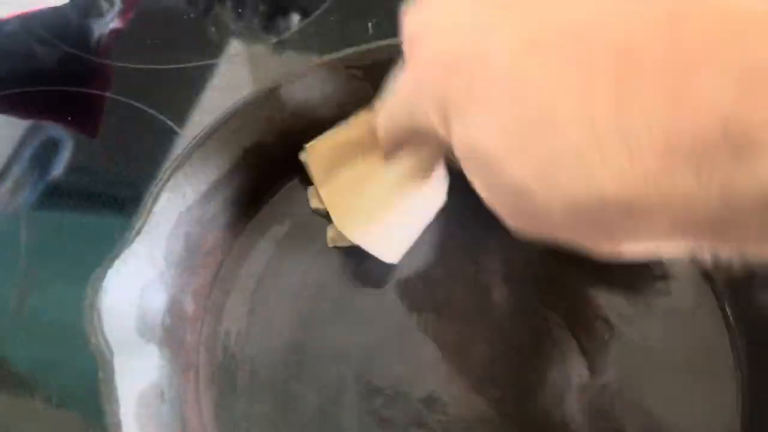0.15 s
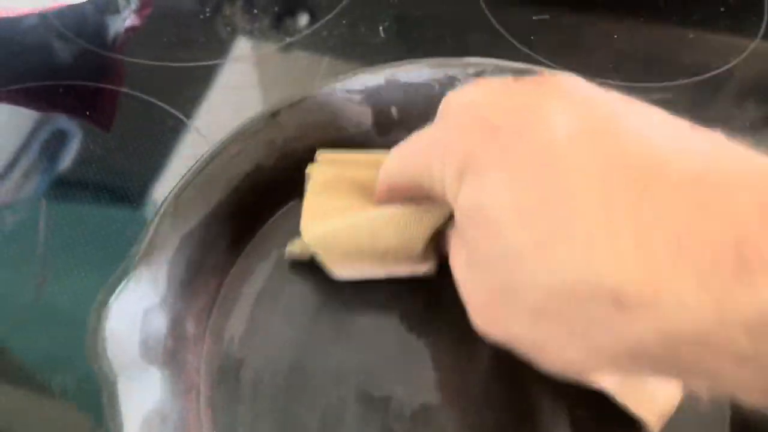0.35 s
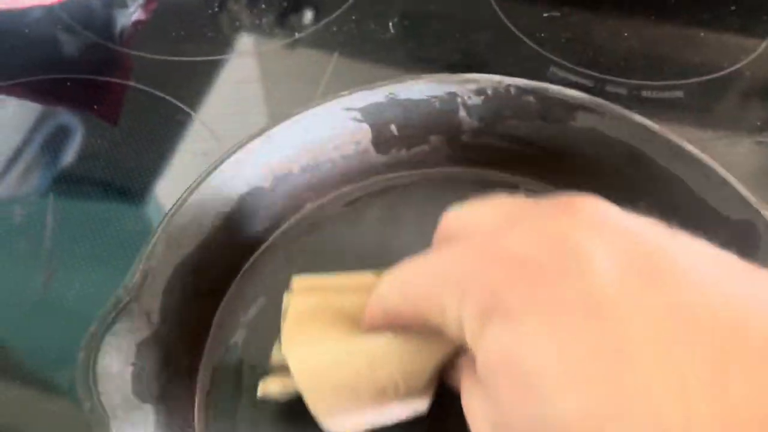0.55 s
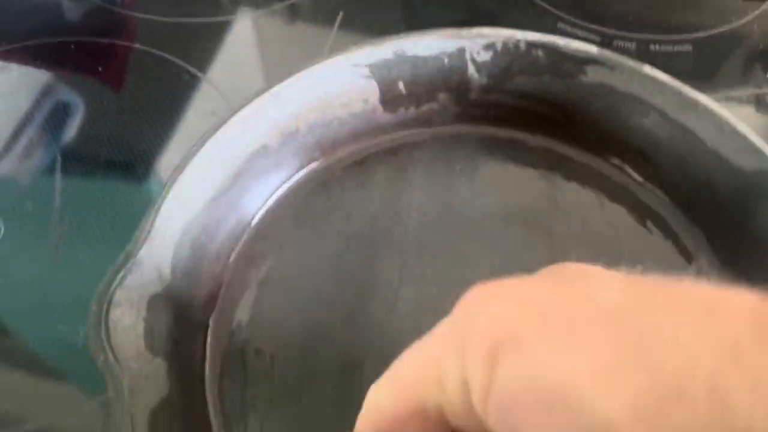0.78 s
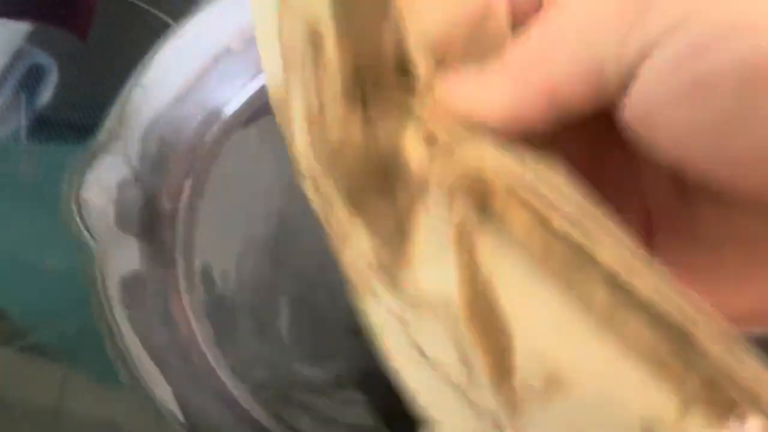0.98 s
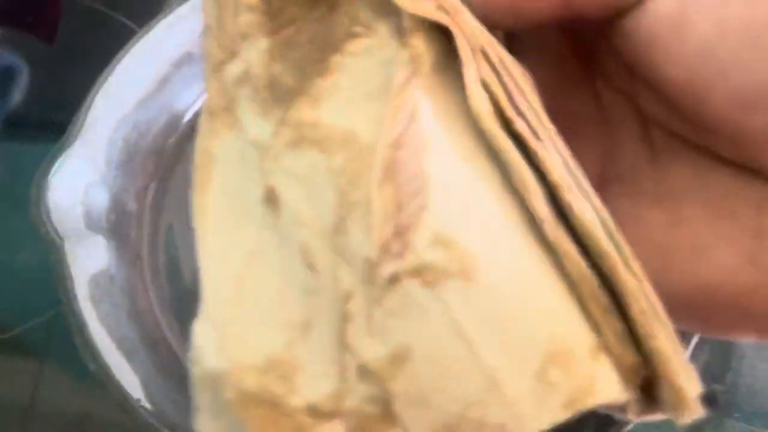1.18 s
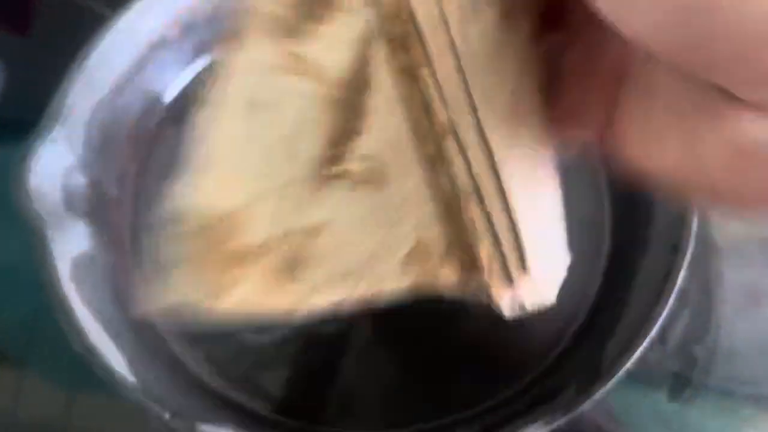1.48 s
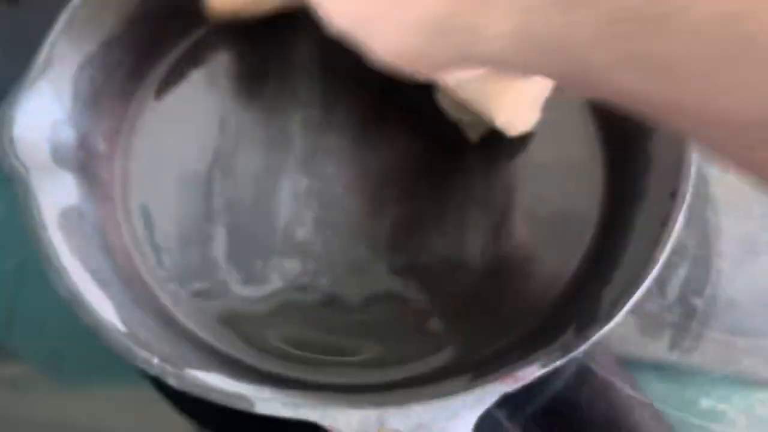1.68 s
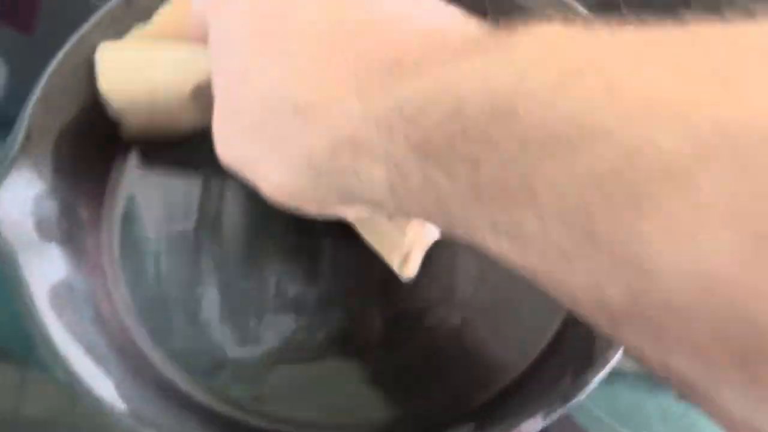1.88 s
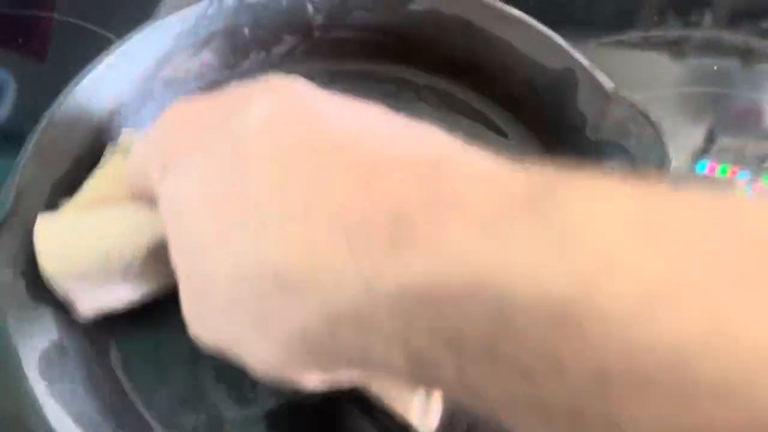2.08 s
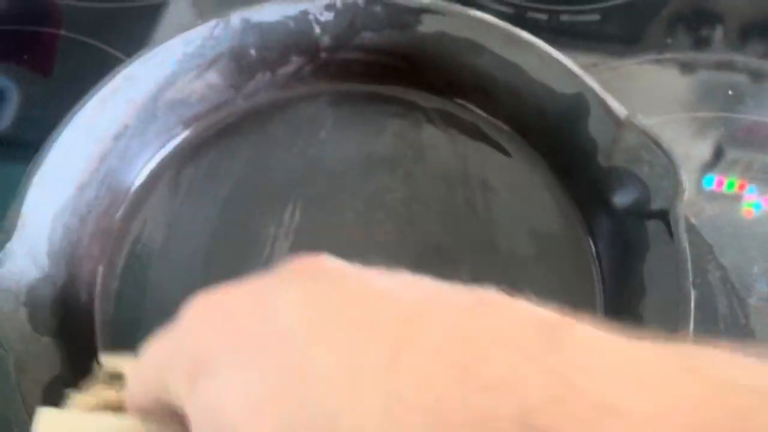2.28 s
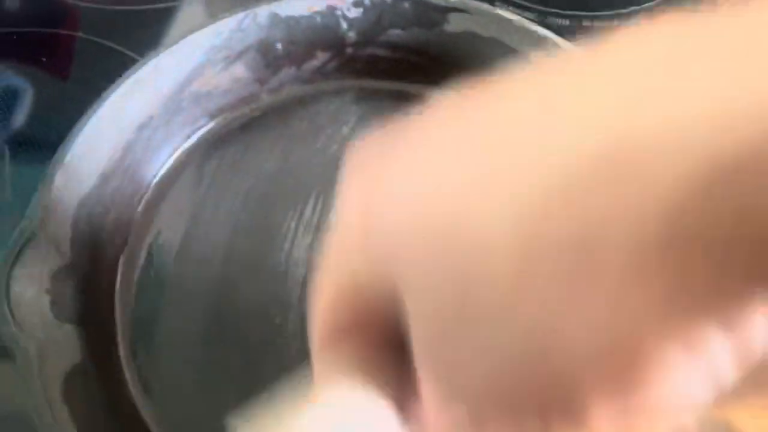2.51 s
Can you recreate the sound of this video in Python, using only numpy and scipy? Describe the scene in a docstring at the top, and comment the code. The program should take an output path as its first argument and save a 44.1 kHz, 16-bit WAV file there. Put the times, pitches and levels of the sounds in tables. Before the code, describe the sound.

A paper towel wipes a wet cast-iron pan, close-miked: bright hiss, fizz and rough scraping swell in strokes from 0 to 1 s, with a heavy dull bump near 0.17 s and a small snap at 0.4. From 1 to 1.5 s it nearly stops, with faint crinkles. Wiping resumes around 1.65; a short sharp iron knock at 1.76, a softer bump at 1.91, a last stroke fading after 2.4. Low hum and air throughout a small kitchen.

```python
"""A folded paper towel wipes around a wet cast-iron pan for a second; its fibres hiss, fizz and scrape.
Where it is pressed it drags and shudders, made of noise in uneven grips and slips; the pan bumps dully on the hob.
Then the towel is lifted and turned in the hand, with small crinkling ticks, and set down.
It wipes again, and early on the iron knocks once, sharply: noise cracks and bright, quickly damped tones.
Throughout, a low hum of wavering sines and a soft rush of air fill the small kitchen."""
import sys
import numpy as np
from scipy import signal
from scipy.fft import rfft, irfft, next_fast_len
from scipy.io import wavfile
from scipy.ndimage import uniform_filter1d, map_coordinates

SR = 44100
rng = np.random.default_rng(int(sys.argv[2]) if len(sys.argv) > 2 else 0)


def dump(signal):
    """Clip the signal to [-1, 1] and save it as 16-bit WAV at the path in sys.argv[1]."""
    limited = np.clip(np.atleast_2d(signal).T, -1, 1)
    pcm = np.round(limited * 32767).astype(np.int16)
    wavfile.write(sys.argv[1], SR, pcm)


N = 116865  # length of the scene, in samples
FLAT = [(100, 0)]  # a spectrum with no colour: (frequency [Hz], level [dB])


def amp(db):
    """Decibels to gain."""
    return 10 ** (np.asarray(db) / 20)


def unit(x):
    """Scale to rms 1."""
    return x / np.sqrt(np.mean(x ** 2) + 1e-20)


def along(points, hz):
    """Read a table of (frequency [Hz], value) on a log frequency axis."""
    f, v = np.transpose(points)
    return np.interp(np.log(hz + 1), np.log(f + 1), v)


def curve(rows, axis=1):
    """One column of a time table, drawn as a line through every sample."""
    rows = np.asarray(rows)
    return np.interp(np.arange(N) / SR, rows[:, 0], rows[:, axis])


def wobble(rate):
    """A smooth random curve with this many random points a second."""
    points = rng.standard_normal(int(N * rate / SR) + 4)
    return map_coordinates(points, [np.arange(N) * rate / SR])


def swell(middle_s, length_s, db):
    """A bell-shaped rise and fall; length_s is its standard deviation."""
    t = np.arange(N) / SR
    return amp(db) * np.exp(-.5 * ((t - middle_s) / length_s) ** 2)


def noise_pair():
    """Two unrelated white noises."""
    return rng.standard_normal((2, N))


def filtered(x, response):
    """Shape x by a gain that depends on frequency."""
    m = next_fast_len(N + SR // 2)
    hz = np.fft.rfftfreq(m, 1 / SR)
    return irfft(rfft(x, m) * response(hz), m)[..., :N]


def add(track, s, sound):
    """Mix a sound into a track at time s."""
    part = track[..., round(s * SR):][..., :sound.shape[-1]]
    part += sound[..., :part.shape[-1]]


def lean(x, left_db):
    """Make the left side louder than the right by left_db; negative leans right."""
    return x * amp([[left_db / 2], [-left_db / 2]])


# how alike left and right are: (frequency [Hz], coherence [0 to 1])
LIKENESS = [(100, .98), (350, .96), (900, .8), (1450, .5), (2000, .75), (2900, .45), (3900, .63),
            (6000, .57), (7100, .42), (8550, .98), (9400, .8), (10300, .97), (11300, .88), (12100, .97),
            (12900, .4)]


def spread(pair, spectrum):
    """Colour two unrelated signals and blend them to a stereo pair of rms 1."""
    def middle_and_side(hz):
        angle = np.arccos(np.clip(along(LIKENESS, hz), -1, 1)) / 2
        return amp(along(spectrum, hz)) * [np.cos(angle), np.sin(angle)]

    mid, side = filtered(pair, middle_and_side)
    return unit(np.array([mid + side, mid - side]))


# steady low hum tones, around which the level wavers: (frequency [Hz], level [dB])
HUM_TONES = [(59.5, -60.5), (119, -61), (178, -64), (280, -64.5)]
# colour of the rushing air: (frequency [Hz], relative level [dB])
AIR_COLOUR = [(20, -42), (40, -19), (58, 1), (80, -1), (115, 1.5), (145, -10), (180, -1.5), (215, -10),
              (275, -2.5), (340, -17.5), (600, -19), (1200, -38.5), (4000, -43.5), (13000, -56)]
AIR_DB = -51.5


def background():
    """An appliance hums, its tones wavering slowly, over a low rush of air."""
    t = np.arange(N) / SR
    hum = np.zeros(N)
    for hz, db in HUM_TONES:
        level = amp(db + 3.4 * wobble(5.55)) * np.sqrt(2)  # sqrt(2): the level is an rms value
        hum += level * np.sin(2 * np.pi * hz * t + 0.38 * wobble(5.1))
    return hum + amp(AIR_DB) * spread(noise_pair(), AIR_COLOUR)


# how long the room takes to die away by 60 dB: (frequency [Hz], decay time [s])
ROOM_DECAY = [(150, 0.36), (1500, 0.19), (10000, .2)]


def kitchen(x):
    """The room's short answer: a fading noise tail for each side."""
    hz, t, z = signal.stft(rng.standard_normal((2, SR // 2)), SR, nperseg=256)
    fade = amp(-60 * t / along(ROOM_DECAY, hz)[:, None])
    tail = signal.istft(z * fade, SR, nperseg=256)[1]
    tail = spread(tail, FLAT)[:, :SR // 2]
    return signal.fftconvolve(x, tail / np.linalg.norm(tail[0]), axes=1)[:, :N]


# the pan is pushed over the hob: (middle [s], length [s], level [dB])
PAN_SHIFTS = [(.005, 0.022, -46), (0.194, 0.018, -33), (0.312, 0.075, -40), (1.83, 0.072, -44),
              (2.518, 0.075, -49)]
# colour of its low rumble: (frequency [Hz], relative level [dB])
RUMBLE_COLOUR = [(30, -22), (55, 0.5), (75, 5), (110, -3.5), (145, 0.5), (200, -7), (260, -1.5),
                 (400, -35.5), (800, -53)]


def shifts():
    """The heavy pan rumbles as it is pushed over the hob: low noise in swells."""
    swells = sum(swell(*row) for row in PAN_SHIFTS)
    return swells * spread(noise_pair(), RUMBLE_COLOUR)


# the pocket under the cupped towel resonates:
# (middle [s], length [s], level [dB], frequency [Hz], half width [Hz])
TOWEL_POCKETS = [(.48, 0.072, -51.5, 4900, 250), (.66, 0.054, -50.5, 2004, 110),
                 (0.942, 0.028, -52.5, 3730, 600), (2.31, .05, -51, 2450, 250),
                 (2.378, .04, -47, 5700, 650)]


def hollows():
    """Rubbing noise rings in the pocket between towel and pan, a narrow band of it each time."""
    out = np.zeros((2, N))
    for s, length_s, db, centre_hz, width_hz in TOWEL_POCKETS:
        resonance = lambda hz: 1 / (1 + ((hz - centre_hz) / width_hz) ** 2)
        band = unit(filtered(spread(noise_pair(), FLAT), resonance))
        out += swell(s, length_s, db) * band
    return lean(out, left_db=-2.5)


# the wet paper catches on the iron: (time [s], level [dB], centre frequency [Hz])
PAPER_SNAPS = [(0.4000, -23, 5060), (1.160, -60.5, 9000), (1.325, -54.5, 1190), (1.536, -46, 7000),
               (1.602, -37, 990), (1.7581, -34, 800), (1.908, -36.5, 2500)]
SNAP_T60_S, SNAP_OCTAVES = 0.014, 1.13  # time to fade by 60 dB; spread around the centre


def snaps():
    """Folds of wet paper catch and let go: short bursts of noise around one pitch region."""
    out, t = np.zeros((2, N)), np.arange(SR // 8) / SR
    for s, db, centre_hz in PAPER_SNAPS:
        bell = lambda hz: np.exp(-.5 * (np.log2((hz + 1) / centre_hz) / SNAP_OCTAVES) ** 2)
        burst = unit(filtered(spread(noise_pair(), FLAT), bell))
        add(out, s, burst[:, :len(t)] * amp(db - 60 * t / SNAP_T60_S))
    return out


STRIKE_SCATTER_DB = 1.5  # random difference in each mode from strike to strike


def ring(modes, t):
    """Damped modes (the tones a struck body rings with), a little different at every strike."""
    out = np.zeros(len(t))
    for k, (hz, db, t60) in enumerate(modes):
        level_db = db + STRIKE_SCATTER_DB * rng.standard_normal()
        sign = (-1) ** k  # neighbouring modes start in opposite directions
        out += sign * amp(level_db - 60 * t / t60) * np.sin(2 * np.pi * hz * t)
    return out


# the pan bumps on the hob: (time [s], level [dB], contact time [s])
PAN_BUMPS = [(0.1638, -26, .0003), (0.1709, -8, 0.0012), (0.206, -20, 0.0013), (1.7578, -30, 0.00023),
             (1.909, -31, 0.00052)]
# low modes of pan and hob: (frequency [Hz], relative level [dB], time to fade by 60 dB [s])
PAN_MODES = [(149.4, -17.5, 0.21), (189, -13, 0.12), (252, -7, 0.062), (289.8, -3, .11), (396, -3.5, 0.064),
             (557, -15.5, .06), (669, -6, 0.063), (780, -17, .06), (868, -6, 0.08), (1004, -16.5, 0.046),
             (1470, -27, 0.036)]
BUMP_RISE_S = 0.0013


def bumps():
    """Soft pushes rock the pan; the longer the contact, the more its higher modes are dulled."""
    out, t = np.zeros(N), np.arange(SR // 2) / SR
    for s, db, contact_s in PAN_BUMPS:
        push = t * np.exp(-2 * t / contact_s)
        ringing = ring(PAN_MODES, t) * (1 - np.exp(-t / BUMP_RISE_S))
        add(out, s, amp(db) * signal.fftconvolve(ringing, push / push.sum()))
    return lean(out, left_db=1.3)


# colour of the fibres' hiss, also of the crack and the crinkles: (frequency [Hz], relative level [dB])
HISS_COLOUR = [(1500, -37), (2800, -8), (3800, -3.5), (4950, 0.5), (7000, 0), (8500, 0), (9600, -2),
               (11400, -1), (13000, -6.5)]
# hard contacts of the iron, so close that they make one knock: (time [s], level [dB])
IRON_CONTACTS = [(1.7557, -26), (1.7579, -25), (1.7601, -35)]
# its bright modes: (frequency [Hz], relative level [dB], time to fade by 60 dB [s])
IRON_MODES = [(2130, -24, 0.044), (4670, -11.5, 0.022), (6130, -2.5, 0.012), (6860, -7, 0.014),
              (8320, 0.5, 0.017), (9470, -5.5, 0.017), (11360, -6.5, 0.014)]
CRACK_DB, CRACK_T60_S = -3.5, 0.011  # level against the contact; time to fade by 60 dB


def knock():
    """The iron chatters on the hard hob: a noise crack and a quickly damped ring."""
    out, t = np.zeros((2, N)), np.arange(SR // 4) / SR
    for s, db in IRON_CONTACTS:
        crack = spread(noise_pair(), HISS_COLOUR)[:, :len(t)]
        crack = crack * amp(CRACK_DB - 60 * t / CRACK_T60_S)
        add(out, s, amp(db) * (ring(IRON_MODES, t) + crack))
    return lean(out, left_db=-1.1)


def fibres(per_s):
    """Tiny catches at random moments: single clicks of random size."""
    return (rng.random(N) < per_s / SR) * noise_pair()


CRINKLE_START_S, CRINKLE_END_S = 1.0, 1.7
CRINKLES_PER_S, CRINKLE_DB = 70, -8  # level against the towel's speed curve


def crinkles(speed_db):
    """Single folds tick while the towel is handled: fading puffs of noise at random moments."""
    t = np.arange(N) / SR
    handled = (t > CRINKLE_START_S) & (t < CRINKLE_END_S)
    decay = np.exp(-t[None, :SR // 50] / 0.0009)
    power = signal.fftconvolve(fibres(CRINKLES_PER_S) ** 2, decay, axes=1)[:, :N]
    ticks = spread(np.sqrt(np.abs(power)) * noise_pair(), HISS_COLOUR)
    return ticks * handled * amp(speed_db + CRINKLE_DB)


def friction(spectrum, slips, smooth_db, patchy_db):
    """Slips over a smooth rub, their colour shifting as the contact changes."""
    pair = unit(slips) + amp(smooth_db) * noise_pair()
    z = signal.stft(pair, nperseg=512)[2]
    # random patches, blurred over frequency and then over time
    field = uniform_filter1d(rng.standard_normal(z.shape[1:]), size=5, axis=0)
    field = uniform_filter1d(field, size=18, axis=1)
    patchy = signal.istft(z * amp(patchy_db * unit(field)), nperseg=512)[1][:, :N]
    return spread(patchy, spectrum)


SLIPS_PER_S, SLIP_JITTER = 190, .35  # typical rate; how unevenly it varies (log scale)


def stick_slip():
    """The pressed wad grips and lets go at an uneven rate; each slip stirs the pan briefly."""
    turns = np.cumsum(SLIPS_PER_S * np.exp(SLIP_JITTER * wobble(120))) / SR
    since_s = turns % 1 / SLIPS_PER_S  # time since the last slip, at the typical rate
    return noise_pair() * np.exp(-since_s / 0.0028)


# how hard the towel drags on the iron, before SHUDDER_DB is added: (time [s], level [dB])
DRAG_LEVEL = [(0, -56), (.04, -56.5), (.075, -44.5), (.14, -56), (.17, -34), (.25, -49), (.33, -42),
              (.42, -41), (.5, -68), (.64, -57), (.8, -59.5), (.835, -38), (.875, -37), (.92, -47),
              (1.05, -66), (1.5, -75.5), (1.61, -55.5), (1.65, -67), (1.74, -51.5), (1.765, -43.5),
              (1.85, -47.5), (1.92, -50.5), (1.99, -59), (2.18, -63), (2.31, -55), (2.43, -61),
              (2.5, -52.5), (2.56, -54), (2.65, -61.5)]
# colour of the shudder: (frequency [Hz], relative level [dB])
SHUDDER_COLOUR = [(40, -30), (70, -8.5), (150, 4.5), (215, -4.5), (290, 3), (420, 5), (490, -3),
                  (580, -1.5), (850, -11), (1200, -27), (2500, -36)]
SHUDDER_DB = 1.5


def shudder():
    """Under pressure the wad sticks and slips, a low rough noise that follows the drag."""
    rub = friction(SHUDDER_COLOUR, stick_slip(), smooth_db=-13.5, patchy_db=1.9)
    return lean(rub * amp(curve(DRAG_LEVEL) + SHUDDER_DB), left_db=0.5)


# colour of the lower scrape: (frequency [Hz], relative level [dB])
GRIND_COLOUR = [(300, -27), (600, -2.5), (850, 1.5), (1050, 0), (1300, -2), (1600, 0.5), (2000, -13),
                (3500, -39)]
GRIND_DB = 2


def grind(level_db):
    """The lower scrape over the iron: fewer catches over a strong smooth rub."""
    rub = friction(GRIND_COLOUR, fibres(1200), smooth_db=5.5, patchy_db=3.0)
    return lean(rub * amp(level_db + GRIND_DB + 0.42 * wobble(54)), left_db=-1.5)


# colour of the upper scrape: (frequency [Hz], relative level [dB])
SCRAPE_COLOUR = [(700, -6), (1400, -13.5), (2000, 0), (2600, -0.5), (3300, -2.5), (4200, -7), (7000, -23.5)]
SCRAPE_DB = 1.5


def scrape(level_db):
    """The upper scrape over the iron: catches in the middle of the spectrum."""
    rub = friction(SCRAPE_COLOUR, fibres(1500), smooth_db=3, patchy_db=1.5)
    return lean(rub * amp(level_db + SCRAPE_DB + 0.83 * wobble(50)), left_db=-1.2)


# colour of the finest fibres: (frequency [Hz], relative level [dB])
FIZZ_COLOUR = [(6000, -30), (8300, -3), (9800, -4), (11500, 0), (13000, 0)]
FIZZ_DB = -3
FIZZ_GROWS, FAST_DB = 1.35, -41  # dB of fizz per dB of speed; the speed level it pivots on


def fizz(speed_db):
    """The finest fibres fizz, and more so when the stroke is fast."""
    rub = friction(FIZZ_COLOUR, fibres(3000), smooth_db=2, patchy_db=4.0)
    level_db = FAST_DB + FIZZ_GROWS * (speed_db - FAST_DB) + FIZZ_DB
    return lean(rub * amp(level_db), left_db=1.8)


HISS_DB = -0.5


def hiss(speed_db):
    """Many fibres catch and let go, so quickly that they blend into a hiss."""
    rub = friction(HISS_COLOUR, fibres(5000), smooth_db=3.5, patchy_db=1.5)
    return rub * amp(speed_db + HISS_DB)


# the two wipes, before each layer's own level is added:
# (time [s], hiss level [dB], upper scrape level [dB], lower scrape level [dB])
WIPES = [
    [(0.0, -57, -60.5, -67), (0.08, -43, -50, -51), (0.146, -41, -47, -50.5), (0.172, -44.5, -45, -44.5),
     (0.216, -38, -51, -50), (0.384, -41.5, -45, -44), (0.398, -42.5, -45.5, -45.5),
     (0.458, -39.5, -51, -63), (0.654, -41.5, -49.5, -54.5), (0.746, -37.5, -50, -56),
     (0.788, -45, -57.5, -57.5), (0.844, -43.5, -49.5, -44), (0.96, -48.5, -49, -56),
     (1.0, -59.5, -63.5, -70)],
    [(1.66, -51.5, -54, -61.5), (1.722, -43, -49, -47.5), (1.748, -47, -49.5, -53), (1.758, -49, -47, -44),
     (1.772, -44.5, -48, -46), (1.902, -46, -49, -52), (1.908, -43, -52, -45.5), (1.94, -48, -54, -57),
     (2.116, -45, -51, -64), (2.214, -39.5, -46.5, -52.5), (2.31, -41, -51.5, -49),
     (2.426, -42.5, -53.5, -59), (2.508, -52.5, -59.5, -50), (2.65, -56, -60, -65.5)],
]
# between them the towel is lifted, turned in the hand and set down (same columns)
TURN_IN_HAND = [(1.02, -70, -75, -73), (1.085, -66.5, -73, -82), (1.11, -83, -78, -75),
                (1.2, -76, -78, -82), (1.27, -95, -103, -98), (1.31, -75, -84, -79),
                (1.35, -67, -66, -70.5), (1.41, -60, -63, -67), (1.527, -62, -70, -68),
                (1.55, -52, -54, -63.5), (1.6, -51.5, -56.5, -55)]


def towel():
    """Fibres hiss and scrape over the iron; under pressure the wad shudders."""
    stroke = np.vstack([WIPES[0], TURN_IN_HAND, WIPES[1]])
    speed_db = curve(stroke) + 1.1 * wobble(60.25)
    fine = lean(hiss(speed_db) + crinkles(speed_db), left_db=-1.4) + fizz(speed_db)
    rough = scrape(curve(stroke, axis=2)) + grind(curve(stroke, axis=3))
    return fine + rough + shudder()


WALL_DB, WALL_MAX_S = -13, .02  # all echoes together; sets the range of delays


def walls(x, count=10):
    """Early echoes off the pan's wall and the worktop comb the spectrum and colour the rubbing."""
    delay_s = WALL_MAX_S * (.1 + rng.random(count))
    gain = rng.choice([-1, 1], count) * amp(WALL_DB) / np.sqrt(count)
    out = x.copy()
    for s, g in zip(delay_s, gain):
        add(out, s, g * x)
    return out / np.sqrt(1 + amp(WALL_DB) ** 2)  # offsets the energy the echoes add


WET_DB = -12  # level of the room's answer


def scene():
    """Wiping, the pan's blows and the room."""
    blows = bumps() + knock() + snaps()
    room = amp(WET_DB) * kitchen(blows) + background()
    return walls(towel()) + hollows() + shifts() + blows + room


# phase between the microphone ports: (frequency [Hz], lead of the left [radians])
PORT_LEAD = [(60, 0), (260, .2), (900, -.65), (1350, -.55), (1800, .55), (2800, -1.8), (3400, -.6),
             (5000, -.4), (6900, -.5), (7500, -1.5), (8400, -.1), (8850, .1), (10250, 3.14), (11850, 6.2),
             (12400, 6.4), (13200, 8.8)]
PORT_HZ, PORT_WIDTH_HZ, PORT_DB = 11290, 2120, 5.5  # resonance of the ports
ROLL_HZ, ROLL_DB_PER_KHZ = 11790, 9  # where the treble starts to fall, and how steeply
TOP_HZ = 13300  # nothing passes from here up


def record(dry):
    """Two microphone ports, out of step with each other, resonate in the top octave and then fall away."""
    def response(hz):
        resonance_db = PORT_DB * np.exp(-((hz - PORT_HZ) / PORT_WIDTH_HZ) ** 2)
        fall_db = ROLL_DB_PER_KHZ * np.maximum(hz - ROLL_HZ, 0) / 1000
        # half of the lead goes to each side
        phase = np.exp(.5j * np.outer([1, -1], along(PORT_LEAD, hz)))
        return amp(resonance_db - fall_db) * phase * (hz < TOP_HZ)

    return filtered(dry, response)


dry = scene()
out = record(dry)
dump(out)
```